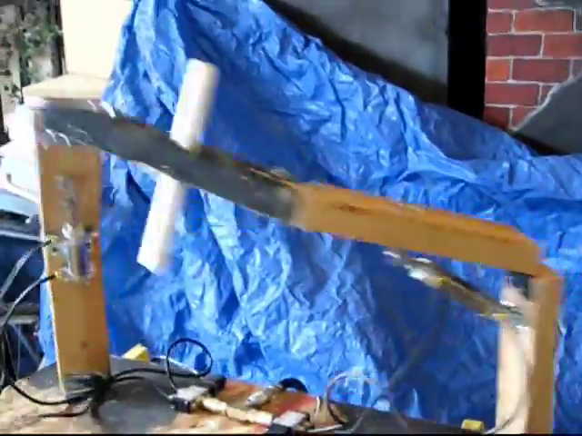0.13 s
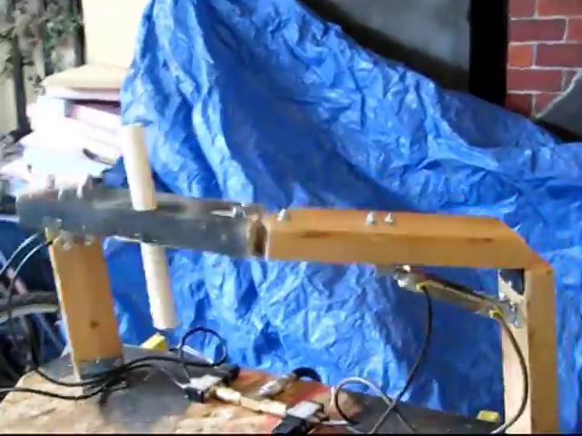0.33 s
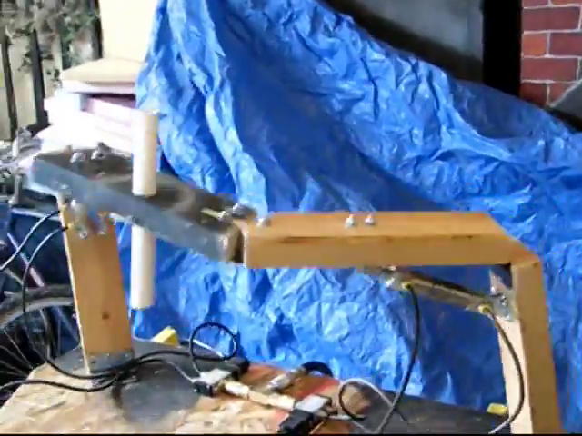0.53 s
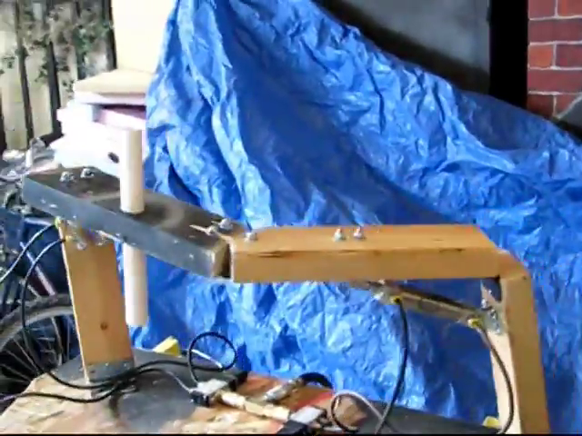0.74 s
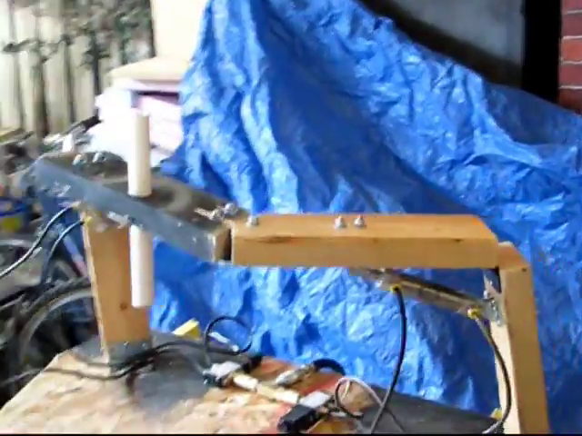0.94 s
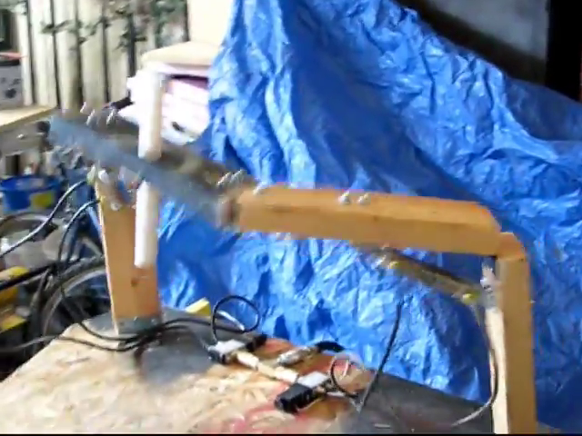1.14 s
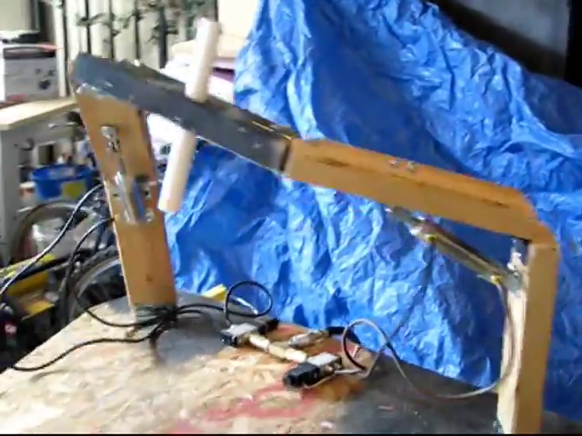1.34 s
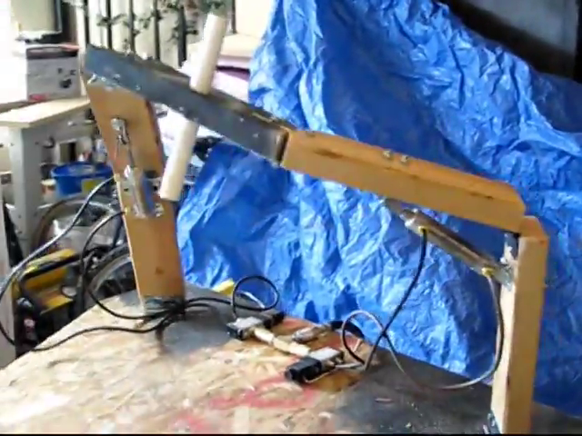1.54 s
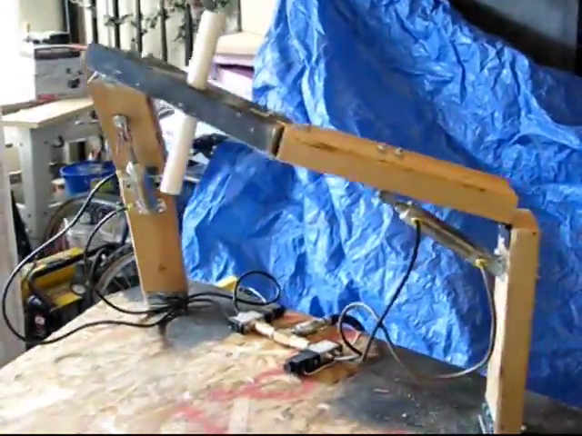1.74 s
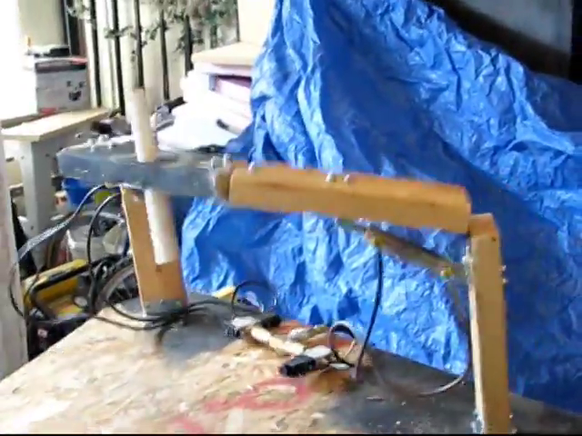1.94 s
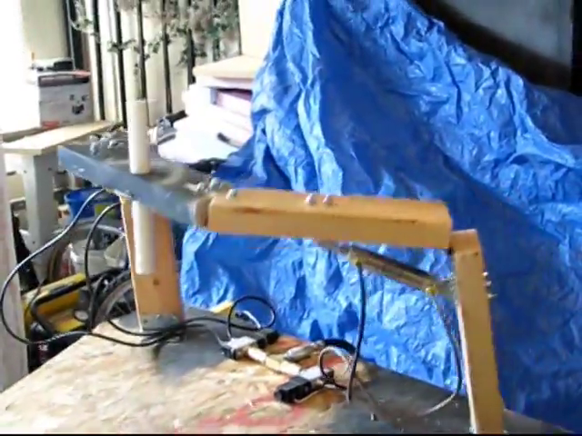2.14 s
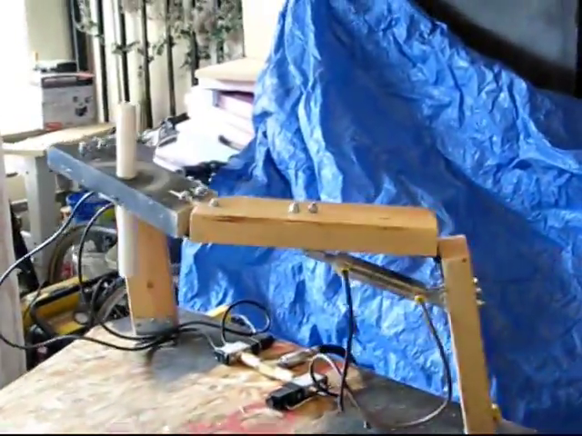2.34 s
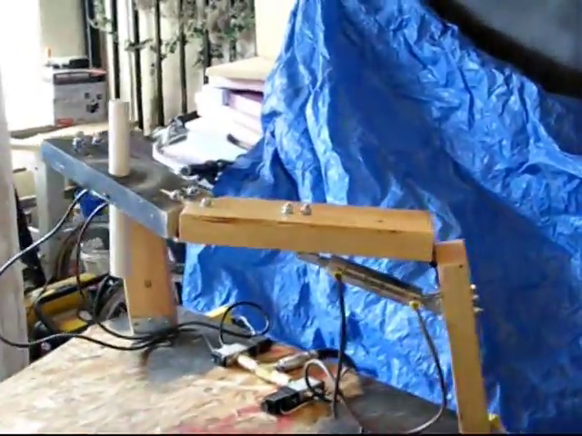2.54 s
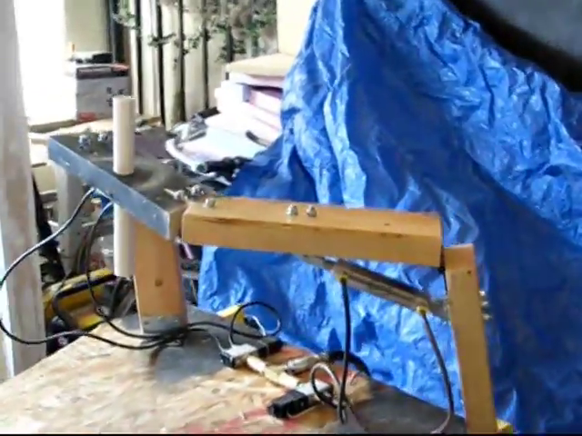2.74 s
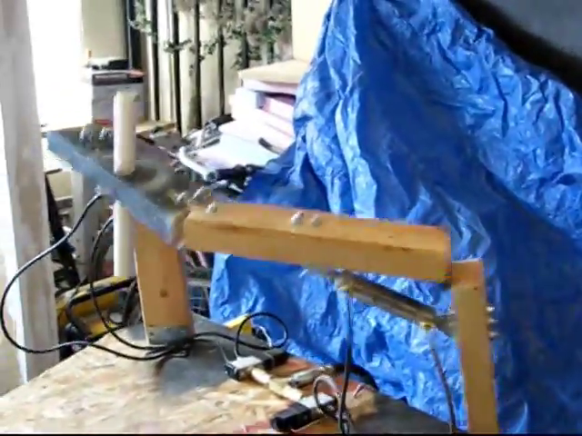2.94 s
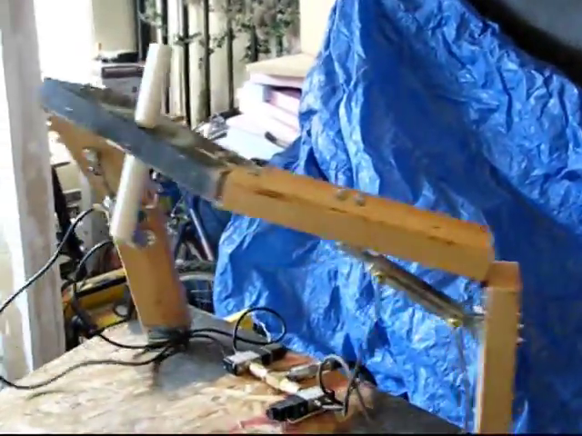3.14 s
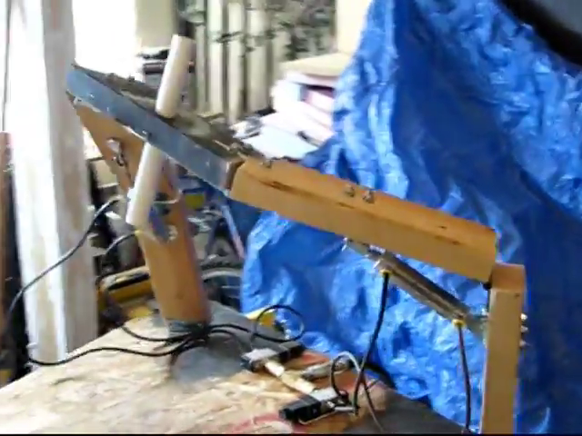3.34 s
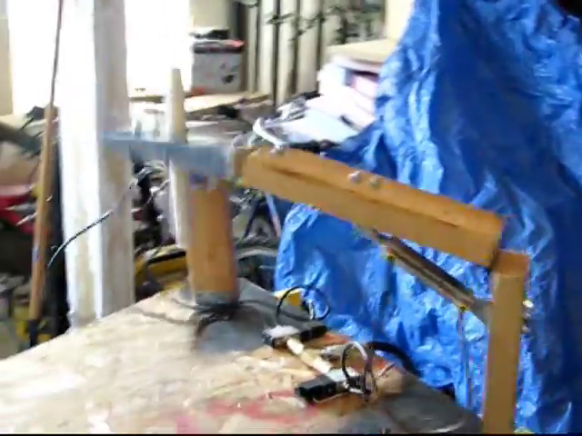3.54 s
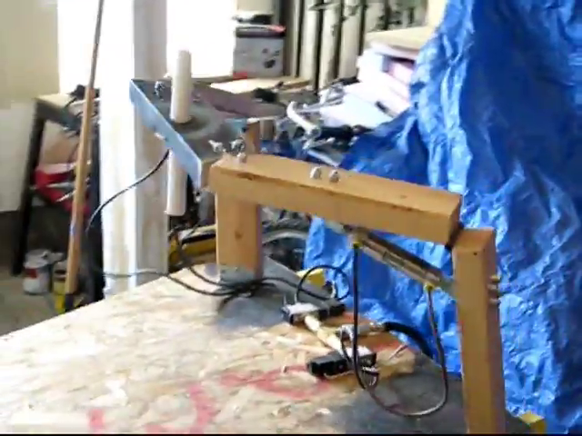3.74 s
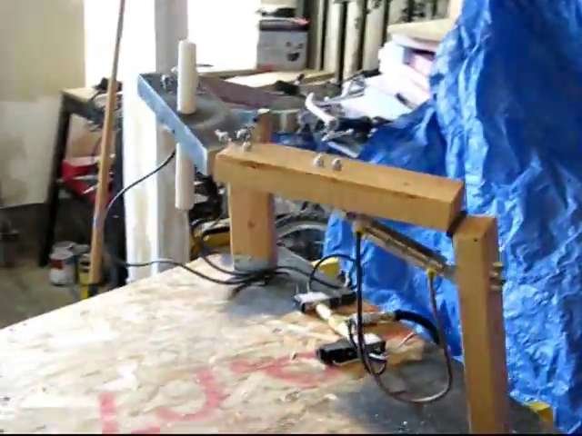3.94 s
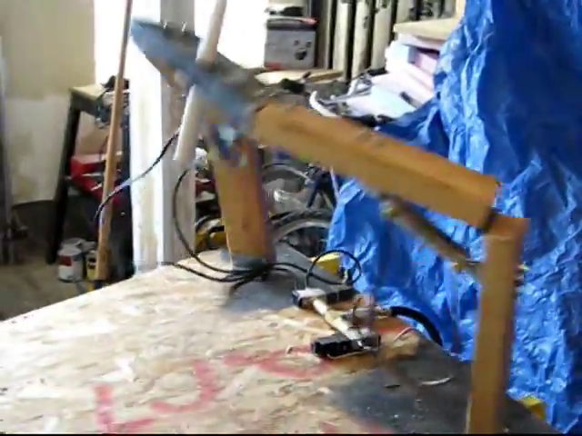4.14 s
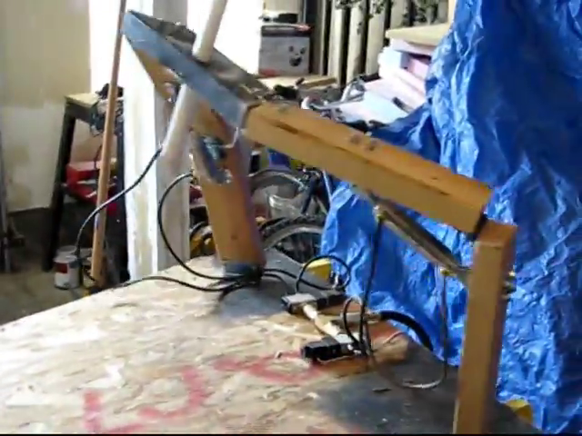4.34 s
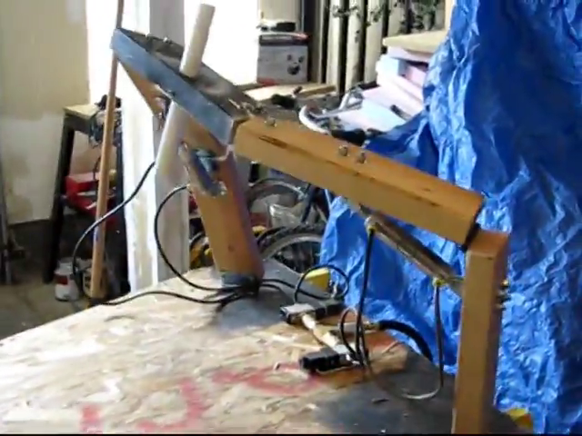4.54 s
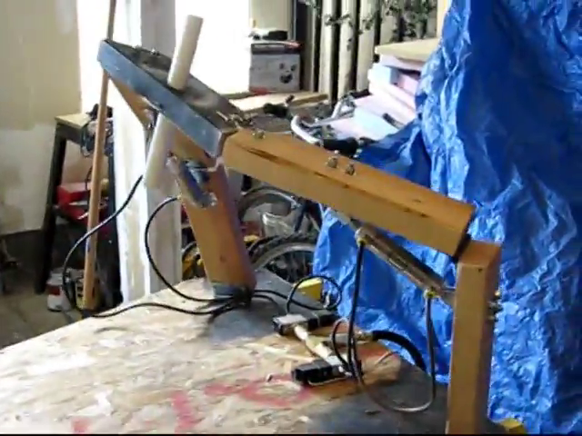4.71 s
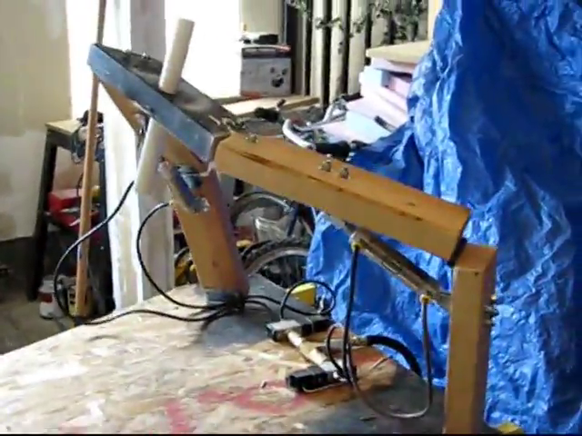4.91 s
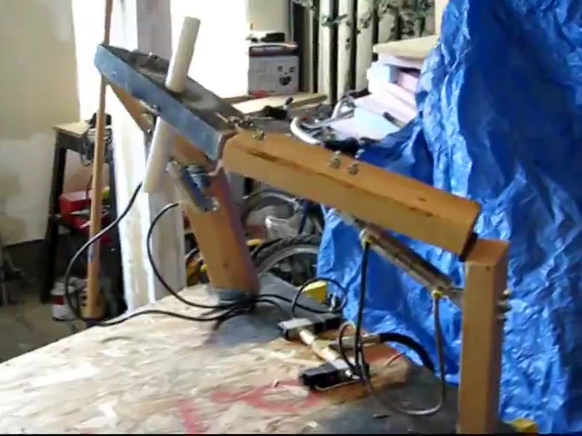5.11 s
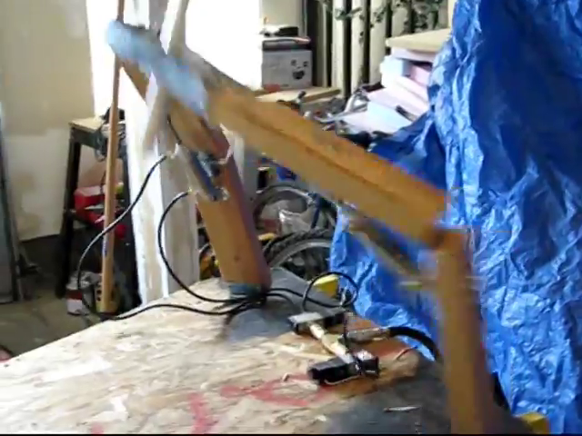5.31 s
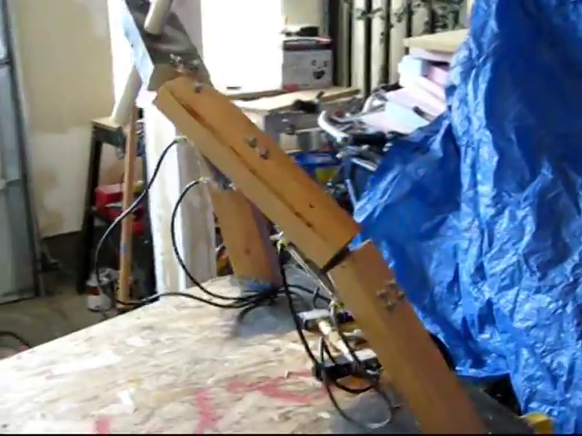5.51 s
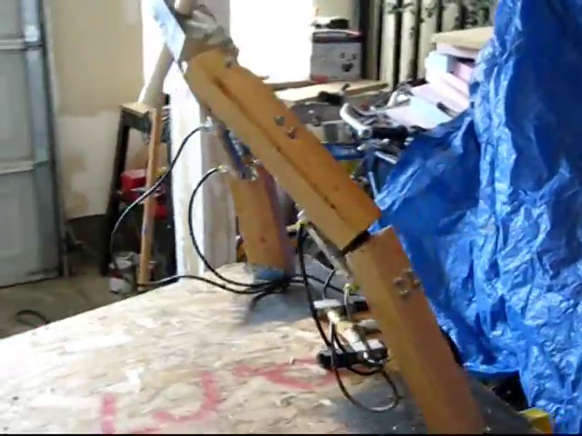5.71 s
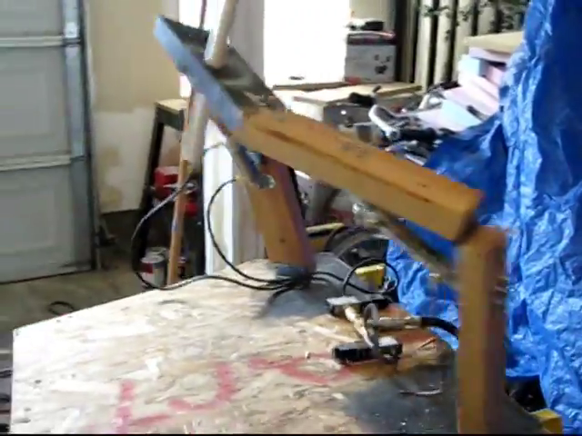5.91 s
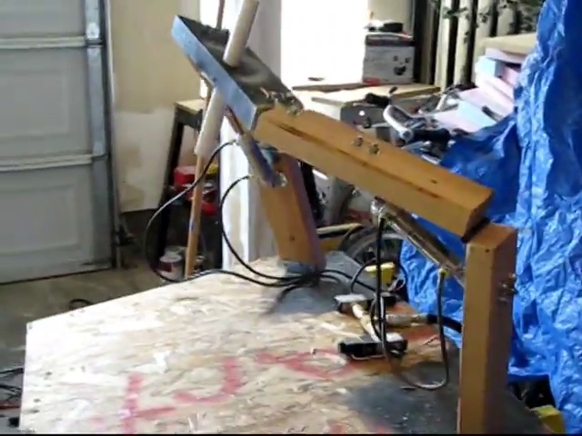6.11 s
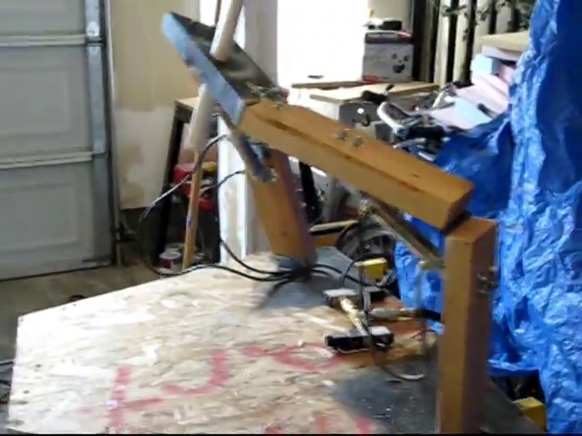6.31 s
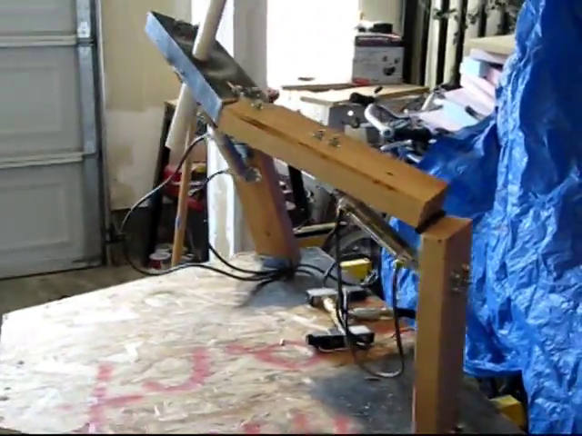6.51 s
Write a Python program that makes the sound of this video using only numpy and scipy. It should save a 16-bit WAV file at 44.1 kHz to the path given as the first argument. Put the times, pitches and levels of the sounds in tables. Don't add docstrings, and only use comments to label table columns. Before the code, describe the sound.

A close stereo camera microphone in a bare, ringing garage. Air is already hissing softly at 0 s as slack hinges rattle; a tiny squeak at 0.2, then a huge metal-and-wood slam at 0.27 with low table ring. Echo fades to faint ticks. At 1.06 a valve snaps with a puff, followed by a medium knock at 1.3. Soft click and air at 1.75, hard slam at 1.89, long decay. Bright snap and air burst at 2.87, double clack at 3.12; click and hiss at 3.45, thin squeaks, loud slam at 3.58. Small high click at 4.0, lighter knock at 4.25, faint ticks around 4.6. The loudest valve snap at 5.27 releases longer air, with bright clatter and a sharp slam at 5.43, more rattling at 5.5, click at 5.73, heavy low thud at 5.84. The echo then dies into distant rumble, hiss and faint ticks until 6.6.

```python
import sys
import numpy as np
from scipy import signal
from scipy.fft import rfft, irfft, next_fast_len
from scipy.io import wavfile
from scipy.ndimage import uniform_filter1d

SR = 44100
rng = np.random.default_rng(int(sys.argv[2]) if len(sys.argv) > 2 else 0)


def bounce(signal):
    frames = np.transpose(np.atleast_2d(signal))
    limited = np.clip(frames, -1, 1)
    pcm = np.round(limited * 32767).astype(np.int16)
    wavfile.write(sys.argv[1], SR, pcm)


def linear_from_db(decibels):
    return 10 ** (np.asarray(decibels, float) / 20)


N = 289296

# [t/s, peak/dB, treble re peak/dB, f/Hz, contact/ms]
PISTONS = [(0.1916, -13, -18, 3900, 2.1), (0.2684, 5, -17, 1520, 4.2), (0.279, -4, -24, 1260, 1.07),
           (1.2514, -25, -22, 2220, 3.3), (1.312, -2.5, -22, 2100, 2.2), (1.3211, -13, -23, 1620, 4.2),
           (1.7863, -16.5, -25, 4360, 3.1), (1.8864, 7, -9, 1600, 1.6), (1.8983, -5.5, -31.5, 2760, 2.5),
           (3.0700, -27, -28, 3470, 3.3), (3.1169, -7, -11, 1300, 4), (3.1326, -6, -33, 5000, 4.4),
           (3.483, -11, -24, 3640, 1.8), (3.5807, 6, -13, 1760, 1.8), (4.2499, -13, -25, 1500, 2.04),
           (4.2534, -12.5, -24.5, 3300, 1.8), (5.2903, -13, 3, 1310, 3.6), (5.4306, 6, -11, 3600, 1.2),
           (5.4337, -3, -3, 1250, 4), (5.5112, -11, -1.5, 2050, 4.1), (5.837, 1, -15, 1190, 4.5)]
# [t/s, peak/dB, treble re peak/dB, f/Hz, contact/ms]
VALVES = [
    (1.059, -15, 0.6, 2140, 1.2),
    (1.7534, -21.5, -5, 2360, 3.6),
    (2.8745, -9, -1, 3000, 1.12),
    (3.4519, -20, -1, 2850, 2.9),
    (4.0004, -16.5, -0.5, 4810, 1.05),
    (5.2687, -4, -5, 5500, 0.92),
    (5.728, -19.5, -5.5, 2280, 3.6),
]
# [t/s, peak/dB, treble re peak/dB]
HINGES = [(0.059, -29, -13), (0.07, -18, -15), (0.1599, -15, -13), (0.1962, -14, -7.5), (0.2177, -15, -16),
          (0.2973, -0.5, -27), (1.3354, -11, -24), (1.7718, -26, -4), (1.79, -13, -18), (1.819, -17, -7),
          (3.1225, -5.5, -19), (3.1363, -14, -32), (3.4684, -22, -10), (3.4887, -10.5, -22),
          (3.5142, -16, -17), (3.5973, -18, -20.5), (3.8166, -27, -10), (4.2715, -12, -19),
          (5.317, -12.5, -7), (5.4316, -4.5, 1), (5.4474, -8.5, -12), (5.5145, -7, -24),
          (5.7572, -14, -1.5), (5.846, -5.5, -27), (5.856, -11, -23), (5.9166, -16, -6.5)]
HINGE_HZ, HINGE_SPREAD, HINGE_MS = 1480, 0.11, 2.5
# [t/s, peak/dB, f/Hz, contact/ms]
CLINKS = [(.277, -7, 3320, 3), (.291, -10.5, 2990, 4), (5.291, -12, 770, 18), (1.242, -26.5, 2235, 3.7),
          (1.262, -27.5, 2187, 6.8), (1.904, -7, 2760, 3), (1.982, -24, 2730, 7), (2.343, -47.5, 3400, 4.8),
          (2.364, -46, 2375, 5), (2.366, -53.5, 3750, 5), (3.599, -13, 3200, 2.7), (4.254, -23, 6800, 3),
          (4.273, -26, 6500, 3), (5.756, -16, 5500, 6), (5.84, -14, 822, 15), (5.911, -14, 3390, 4)]
# [t/s, peak/dB, loudest arm f/Hz, its level re peak/dB]
BLOWS = [(0.107, -22.5, 696, -9.5), (0.243, -22, 450, -7), (0.268, -15.5, 1340, -10.5),
         (0.289, -11.5, 1100, -4), (0.808, -49.5, 301, 1), (1.067, -22.5, 345, -16),
         (1.754, -30.5, 540, -10.5), (1.791, -17.5, 380, -9.5), (1.815, -15.5, 1460, -6),
         (1.889, -10.5, 366, -7.5), (1.901, -15, 660, -2), (1.951, -18, 610, -2), (1.982, -21, 805, -3),
         (3.068, -30.5, 374, -8), (3.452, -28, 804, -6), (3.48, -20.5, 370, -1.5), (3.58, -9, 1380, -10.5),
         (3.599, -12.5, 585, -10), (3.683, -17, 390, -8.5), (4.27, -17, 1750, -9), (5.276, -20, 646, -4),
         (5.448, -10, 574, -13.5), (5.84, -8.5, 784, -17.5), (5.851, -10.5, 577, -16),
         (6.184, -43, 860, -16)]
# [t/s, peak/dB,
# loudest arm f/Hz, its level re peak/dB]
JOLTS = [(0.0, -24.5, 3396, -5), (0.057, -24.5, 652, 0.5), (0.159, -26.5, 1420, -4),
         (0.191, -18.5, 338, -9.5), (1.151, -33, 700, -7), (1.243, -34, 334, -0.5), (1.313, -19, 775, -32),
         (1.334, -26, 380, -4), (2.884, -27, 298, -21.5), (2.972, -31.5, 363, -9.5),
         (3.115, -20, 371, -3.5), (3.133, -13.5, 1100, -12), (3.469, -26.5, 404, -24.5),
         (3.513, -17.5, 620, -10.5), (4.06, -36, 672, -6), (4.249, -18.5, 410, -9), (5.288, -18, 734, 0),
         (5.431, -15, 1700, -7), (5.505, -19.5, 575, -3), (5.747, -37, 740, 9), (5.91, -18.5, 540, -9.5)]
BLOW_MS, JOLT_MS = 8, 28
# [f/Hz, level per Hz/dB]
WOOD = [(24, -45), (40, -16), (171, -4.5), (256, -7), (392, -8), (1270, -7.5), (2570, -12.5), (2770, -15),
        (3220, -7.5), (12800, -25.5), (16000, -50)]
# [f/Hz, level/dB, t60/s]
ARMS = [(350, -10.5, 0.12), (390, -20, 0.033), (516.3, -3, 0.043), (616.2, -3, 0.095), (744, -6.5, 0.053),
        (910, -10, 0.043), (1260, -11, 0.031), (1637, 0, 0.043), (2685, -4.5, 0.034)]
# [t/s, level/dB]
STAMPS = [(.159, -21), (.285, -15), (.848, -55.5), (1.334, -32), (1.815, -26.5), (2.884, -35.5),
          (3.068, -30.5), (3.132, -30), (3.452, -33), (3.683, -24), (4.194, -35), (4.27, -32), (5.276, -29),
          (5.448, -18), (5.84, -17.5)]
# [f/Hz, level/dB, t60/s]
TABLE = [(127.6, -0.5, 0.16), (263.7, -5, 0.71), (374.5, -7.5, 0.37)]
TABLE_SHARE_DB = -18.5
# [t/s, peak/dB, f/Hz, t60/s]
THUMPS = [(0.277, -24, 218, 0.14), (1.067, -41, 143, 0.14), (1.313, -28, 145, 0.14),
          (1.784, -29, 170, 0.14), (1.894, -28, 183, 0.14), (1.949, -29, 205, 0.14),
          (2.882, -39, 196, 0.14), (2.969, -40, 116, 0.14), (3.117, -26, 143, 0.14),
          (3.579, -29, 178, 0.14), (3.999, -45, 218, 0.14), (4.07, -42, 151, 0.14), (4.252, -32, 170, 0.14),
          (5.275, -34, 218, 0.14), (5.431, -22, 124, 0.14), (5.844, -16, 151, 0.14),
          (6.059, -41, 213, 0.14)]
# [t/s, peak/dB, f/Hz, t60/s]
RINGS = [(.06, -31, 640, .2), (.29, -24, 335, .3), (.30, -26, 1310, .2), (1.067, -19, 600, .015),
         (1.287, -55, 9100, .2), (1.474, -42, 3060, .02), (2.0, -36, 265, .9), (1.97, -29, 703, .4),
         (1.9, -26, 620, .15), (2.882, -17, 600, .015), (3.17, -22, 250, .08), (3.19, -23, 280, .08),
         (3.222, -23, 250, .1), (3.118, -14, 4800, .012), (3.13, -26, 335, .3), (3.295, -48, 12500, .01),
         (3.478, -26, 10200, .012), (3.485, -28, 1800, .1), (3.515, -28, 1850, .1), (3.643, -34, 9000, .01),
         (3.722, -40, 6500, .01), (3.75, -40, 6500, .01), (3.808, -46, 11000, .01), (4.009, -23, 600, .015),
         (4.272, -27, 1750, .25), (4.25, -20, 3200, .03), (4.33, -30, 200, .15), (4.197, -52, 13000, .012),
         (4.273, -36, 13000, .012), (5.276, -18, 1400, .012), (5.431, -10, 6000, .012),
         (5.845, -15, 165, .07), (5.85, -21, 264, .4), (5.29, -16, 690, .15), (5.30, -20, 834, .3),
         (5.31, -23, 899, .3), (5.33, -25, 651, .3), (5.435, -18, 9800, .012), (5.497, -21, 571, .2),
         (5.507, -24, 9800, .012), (5.757, -28, 790, .5), (5.84, -18, 813, .3), (5.86, -24, 544, .2),
         (.07, -34, 7300, .03), (.269, -10, 3100, .015), (.2955, -10, 2900, .01), (1.904, -10, 2760, .01),
         (1.985, -20, 2730, .02), (1.12, -36, 700, .2), (.245, -32, 2600, .015), (1.8, -32, 4400, .015),
         (1.824, -30, 6500, .015)]
# [t/s, level/dB,
# rise/ms, t60/s, share of filling/0-1]
VENTS = [(0.0, -35, 1.2, 0.33, 0.95), (0.1, -34, 8, .4, 0.7), (1.0585, -28, 6, 0.34, 0),
         (6.37, -63, 36, 1.5, .3), (4.16, -45, 30, .8, .95), (1.772, -25, 5.8, 0.4, 0.53),
         (2.874, -26, 0.88, 0.34, .05), (3.472, -26, 14, 0.5, 0.53), (3.53, -29, 15, .45, .55),
         (4.0, -33.5, 1.2, 0.41, 0), (5.27, -28, 8, 1.02, .7), (5.75, -29, 5, .55, 0.75),
         (0, -80, 20, 0.62, 0.05), (1.0, -72, 16, .5, .1), (5, -57, 15, 0.73, 0.3),
         (4, -63.5, 10, 0.34, 0.09)]
# [f/Hz, level per Hz/dB]
EXHAUST = [(59, -30), (100, -11), (302, -6.5), (648, -5), (854, -9.5), (1390, -12.5), (1950, -1.5),
           (2370, -7), (3050, -2.5), (4200, -5), (5300, -1), (6700, -9), (8600, -13), (11000, -6),
           (13500, -11), (16000, -14.5)]
# [f/Hz, level per Hz/dB]
FILL = [(59, -37.5), (100, -6.5), (930, -3), (1680, -2.5), (3320, -12.5), (5900, -13.5), (7450, -22),
        (8640, -20), (16000, -29.5)]
# [t/s, level/dB, f/Hz, length/ms, overtones per step/dB]
SQUEAKS = [
    (0.19, -25.5, 4080, 13, -21),
    (.208, -34, 6500, 27, -33.5),
    (3.552, -22, 4810, 21, -30.5),
    (3.569, -17, 6110, 19, -27),
    (3.575, -28, 12200, 6.2, -30),
    (5.397, -31, 8500, 11, -28),
    (5.413, -37, 8500, 12, -18.5),
    (5.82, -38, 6200, 17, -29),
    (2.776, -67, 291, 24, 3.5),
    (3.032, -40, 2830, 8.5, -26),
]
# [t/s, peak/dB, f/Hz]
TICKS = [(0.58, -52, 6900), (0.631, -53, 6000), (0.642, -68, 8370), (1.002, -62, 8100), (1.013, -50, 6000),
         (1.04, -59, 7980), (1.618, -47.5, 5385), (2.235, -49.5, 4430), (3.289, -33, 6800),
         (4.168, -57, 12100), (4.561, -49, 10430), (4.587, -46, 10070), (4.61, -46, 7860),
         (4.633, -45, 5140), (4.646, -42, 8500), (6.19, -42, 7520), (6.556, -50, 6970)]
TICK_MS = 2.9
# [f/Hz, t60/s]
GARAGE = [(60, .85), (160, 0.67), (420, 0.67), (1100, 0.73), (2900, 0.6), (7700, .44), (14000, 0.26)]
# [f/Hz, level/dB]
WALLS = [(40, -3), (170, 4), (450, -2), (1200, 0.37), (3000, -2.5), (5000, -2.5), (9000, -4.5),
         (15000, -7.5)]
# [f/Hz, likeness/0-1]
SAME = [(60, 0.99), (180, 1), (550, 0.97), (1650, 0.72), (4970, 0.12), (15000, 0.35)]
# [f/Hz, level per Hz/dB]
FLOOR = [(18, -31), (42, 4), (70, -4), (141, -8), (189, -25.5), (554, -22.5), (600, -19.5), (1040, -22),
         (2830, -28.5), (5040, -29), (13300, -38.5), (16000, -41.5)]
FLOOR_DB = -60
# [f/Hz, left re right/dB, left lead/rad]
PORTS = [(500, -.2, 0), (1400, -1.3, 0), (2800, -3, .4), (3700, 0, .9), (5500, 2, .3), (13000, -1.2, -.1)]
EDGE_HZ = 15900


def evened(x):
    return x / np.sqrt(np.mean(x ** 2) + 1e-20)


def read(points, hz):
    rows = np.transpose(points)
    return np.interp(np.log(hz + 1), np.log(rows[0] + 1), rows[1])


def add(mix, s, sound):
    part = mix[max(round(s * SR), 0):][:len(sound)]
    part += sound[:len(part)]


def coloured(x, points):
    log_gain = np.log(linear_from_db(read(points, abs(np.fft.fftfreq(4096, 1 / SR)))))
    taps = np.fft.ifft(np.exp(np.conj(signal.hilbert(log_gain)))).real[:2048]
    return signal.oaconvolve(x, taps / np.linalg.norm(taps))[:len(x)]


def ring(x, hz, width):
    r = np.exp(-np.pi * width / SR)
    y = signal.lfilter([1, 0, -1], [1, -2 * r * np.cos(2 * np.pi * hz / SR), r * r], x)
    return y / abs(y).max()


def modes(table, t, chance):
    hz, db, t60 = np.transpose(table)[..., None]
    level, detune = chance[:, :len(table), None]
    decay = linear_from_db(db + 4.7 * level - 60 * t / t60)
    return (decay * np.sin(2 * np.pi * hz * (1 + .012 * detune) * t)).sum(0)


def crack(noise, db, treble_db, hz, ms, top_hz=8500):
    u = np.arange(len(noise)) / SR / (abs(ms) / 1000 * 0.52 + 1e-4)
    burst = noise * u * np.exp(-u ** 2 / 2)
    dull = signal.lfilter(*signal.butter(2, min(3.14 * hz, 15000), fs=SR), burst)
    body = ring(dull, hz, 0.98 * hz)
    bright = ring(ring(burst, top_hz, 9100), top_hz, 9100)
    return linear_from_db(db) * (0.56 * body + linear_from_db(treble_db) * bright)


def knocks():
    pitch = HINGE_HZ * np.exp(HINGE_SPREAD * rng.standard_normal(len(HINGES)))
    rattle = [(s, db, treble_db, hz, HINGE_MS) for (s, db, treble_db), hz in zip(HINGES, pitch)]
    snaps = [(*row, 11000) for row in VALVES]
    rows = PISTONS + snaps + rattle
    out = np.zeros(N)
    for (s, db, treble_db, *shape), z in zip(rows, rng.standard_normal((len(rows), 1500))):
        add(out, s - .001, crack(z, db, treble_db - 1, *shape))
    return out


def clinks():
    out, t = np.zeros(N), np.arange(1500) / SR
    for (s, db, hz, ms), z in zip(CLINKS, rng.standard_normal((len(CLINKS), 1500))):
        u = t * 1000 / max(0.36 * ms, .2)
        soft = ring(z * u * np.exp(-u), hz, 0.25 * hz)
        add(out, s - .001, linear_from_db(db) * ring(soft, hz, 0.51 * hz))
    return out


def thuds():
    shake, arms, t = np.zeros(N), np.zeros(N), np.arange(4000) / SR
    rows = [(*row, BLOW_MS) for row in BLOWS] + [(*row, JOLT_MS) for row in JOLTS]
    noise = rng.standard_normal((len(rows), 4000))
    chance = rng.standard_normal((len(rows), 2, len(ARMS)))
    for (s, db, hz, arm_db, ms), z, c in zip(rows, noise, chance):
        burst = z * (1 - np.exp(-t / .0015)) * np.exp(-t * 1000 / max(ms, 1))
        punch = 1 + 1.6 * np.exp(-t / 0.0016)
        add(shake, s, linear_from_db(db - 10) * burst * punch)
        add(arms, s, linear_from_db(db + arm_db) * ring(burst, hz, 0.17 * hz))
        add(arms, s, linear_from_db(db - 10.5) * modes(ARMS, t, c) * (1 - np.exp(-t / .002)))
    return coloured(shake, WOOD) + arms


def table_top():
    out, t = np.zeros(N), np.arange(SR // 2) / SR
    rows = STAMPS + [(row[0], row[1] + TABLE_SHARE_DB) for row in BLOWS + JOLTS]
    for (s, db), c in zip(rows, rng.standard_normal((len(rows), 2, len(TABLE)))):
        add(out, s, linear_from_db(db - 3.5) * modes(TABLE, t, c / 3) * (1 - np.exp(-t / 0.011)))
    return out


def rings():
    out, t = np.zeros(N), np.arange(SR // 2) / SR
    for s, db, hz, t60 in THUMPS + RINGS:
        level = linear_from_db(db - 60 * t / max(t60, .004)) * (1 - np.exp(-t * hz / .8))
        beat = 1 + .3 * np.sin(2 * np.pi * .035 * hz * t)
        add(out, s, level * beat * np.sin(2 * np.pi * hz * t))
    return out


def air():
    flow, t = np.zeros((2, N)), np.arange(SR) / SR
    for s, db, ms, t60, filling in VENTS:
        jet = linear_from_db(db - 60 * t / t60) * (1 - np.exp(-t * 1000 / ms))
        add(flow[0], s, np.sqrt(1 - filling) * jet)
        add(flow[1], s, np.sqrt(filling) * jet)
    gusts = linear_from_db(1.2 * evened(uniform_filter1d(rng.standard_normal(N), 150)))
    outward, inward = flow * gusts * rng.standard_normal((2, N))
    return coloured(outward, EXHAUST) + coloured(inward, FILL)


def squeaks():
    out = np.zeros(N)
    for (s, db, hz, ms, step_db), z in zip(SQUEAKS, rng.standard_normal((len(SQUEAKS), 2, 3000))):
        size = round(ms * SR / 1000)
        waver, grip = evened(uniform_filter1d(z, 70))[:, :size]
        turns = np.cumsum(hz * (1 + .01 * waver)) / SR
        tone = np.zeros(size)
        for k in range(4):
            if hz * (k + 1) < SR / 2:
                tone += linear_from_db(step_db * k) * np.sin(2 * np.pi * (k + 1) * turns)
        add(out, s, linear_from_db(db) * linear_from_db(3.7 * grip) * tone * signal.windows.tukey(size, .7))
    return out


def ticks():
    out = np.zeros(N)
    for (s, db, hz), z in zip(TICKS, rng.standard_normal((len(TICKS), 1500))):
        add(out, s - .001, crack(z, db, -21.5, hz, TICK_MS))
    return out


def near(x):
    hz = np.fft.rfftfreq(256, 1 / SR)
    same = np.clip(read(SAME, hz), 0, 1)
    phase = np.cumsum(rng.uniform(-3.0, 0, len(hz)))
    paths = np.sqrt((1 - same) / (1 + same)) * np.exp(1j * phase)
    side = linear_from_db(-2.5) * signal.oaconvolve(x, irfft(paths))[:N]
    return np.array([x + side, x - side])


def pair(a, b):
    hz, t, (za, zb) = signal.stft(np.array([a, b]), SR, nperseg=512, noverlap=384)
    same = np.clip(read(SAME, hz), 0, 1)[:, None]
    mid, side = za * np.sqrt(1 + same), zb * np.sqrt(1 - same)
    return hz, t, np.array([mid + side, mid - side]) / np.sqrt(2)


def garage(x):
    hz, t, z = pair(*rng.standard_normal((2, N)))
    blur = np.exp(-((hz[:, None] - hz) / (50 + .1 * hz)) ** 2)
    power = blur / blur.sum(0) @ abs(signal.stft(x, SR, nperseg=512, noverlap=384)[2]) ** 2
    keep = linear_from_db(-120 * t[1] / read(GARAGE, hz))
    power = np.array([signal.lfilter([1 - r], [1, -r], p) for r, p in zip(keep, power)])
    late = np.pad(power, ((0, 0), (1, 0)))[:, :-1]
    power = signal.lfilter([0.04, 0.074, 0.03, 0.076], [1, -.7], late, axis=1)
    peaks_db = 1.6 * rng.standard_normal(len(hz))
    echoes_db = 0.8 * rng.standard_normal(len(t))
    flutter = linear_from_db((read(WALLS, hz) + peaks_db)[:, None] + echoes_db)
    clumps = uniform_filter1d(rng.standard_normal(power.shape), size=5, axis=0)
    clumps = uniform_filter1d(clumps, size=6, axis=1)
    flutter = flutter * linear_from_db(2.1 * evened(clumps) - .3)
    z = z / np.sqrt(np.mean(abs(z) ** 2)) * np.sqrt(power) * flutter
    return signal.istft(z, SR, nperseg=512, noverlap=384)[1][:, :N]


def floor():
    hz, t, z = pair(*rng.standard_normal((2, N)))
    lumps = evened(uniform_filter1d(rng.standard_normal(len(t)), 16))
    rumble_db = 1.7 * lumps * (hz[:, None] < 250)
    z = z * linear_from_db(read(FLOOR, hz)[:, None] + rumble_db + 0.55 * lumps)
    return linear_from_db(FLOOR_DB) * evened(signal.istft(z, SR, nperseg=512, noverlap=384)[1][:, :N])


def ducking(x):
    power_db = 10 * np.log10(abs(uniform_filter1d((x ** 2).mean(0), 400)) + 1e-12)
    fall = np.arange(N) * 38. / SR
    held_db = np.maximum.accumulate(power_db + fall) - fall
    over_db = np.clip(held_db + 46.5, 0, 30)
    return linear_from_db(-.25 * over_db)


def scene():
    metal, wood = knocks() + clinks(), thuds()
    table = table_top() + linear_from_db(-3) * rings()
    jets, small, tones = air(), ticks(), squeaks()
    direct = metal + wood + table + jets + small + tones
    wet = linear_from_db(-1.5) * metal + linear_from_db(4) * wood + linear_from_db(-5) * table
    wet = wet + linear_from_db(-5.5) * jets + linear_from_db(8) * small + linear_from_db(-3.5) * tones
    prop = near(direct) + garage(wet)
    return prop + linear_from_db(1.5) * ducking(prop) * floor()


def low_pass(x):
    return signal.sosfilt(signal.butter(12, 17020, fs=SR, output="sos"), x)


def record(dry):
    size = next_fast_len(N)
    hz, ports = np.fft.rfftfreq(size, 1 / SR), np.array(PORTS)
    tilt = linear_from_db(read(ports, hz) / 2) * np.exp(.5j * read(ports[:, ::2], hz))
    x = irfft(rfft(dry, size) * [tilt, 1 / tilt], size)[:, :N]
    limited = 1.1 * np.tanh(x / 1.1)
    edge = signal.firwin(255, EDGE_HZ, window="blackman", fs=SR)
    x = signal.oaconvolve(limited, edge[None], "same")
    x = signal.lfilter(*signal.butter(2, 38, "high", fs=SR), x)
    return low_pass(x)


dry = scene()
out = record(dry)
bounce(out)
```